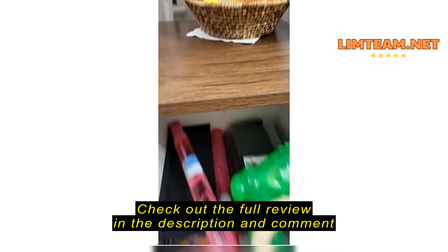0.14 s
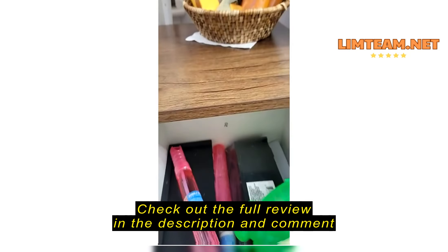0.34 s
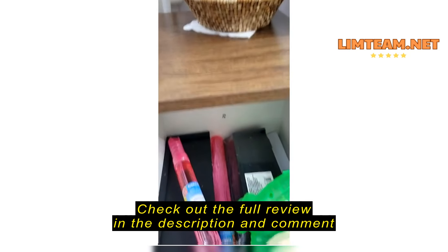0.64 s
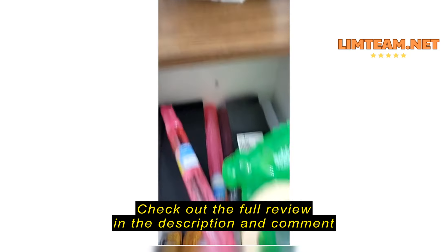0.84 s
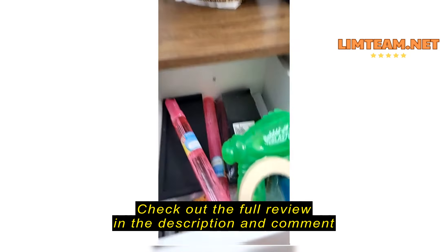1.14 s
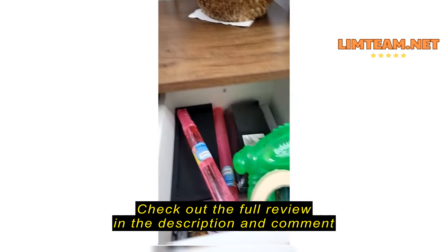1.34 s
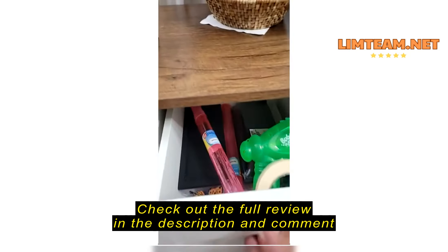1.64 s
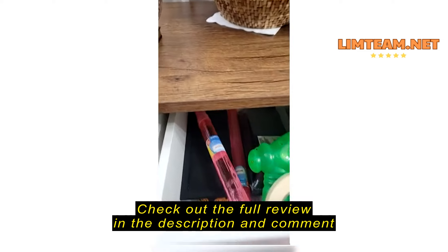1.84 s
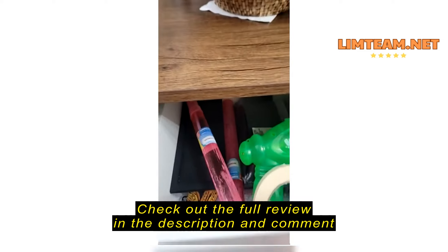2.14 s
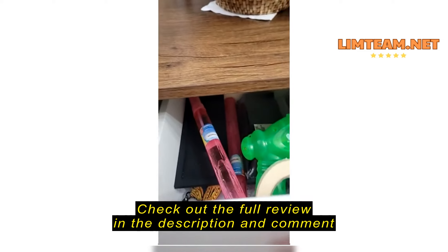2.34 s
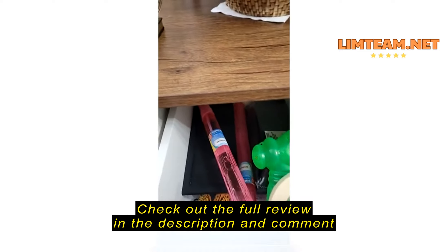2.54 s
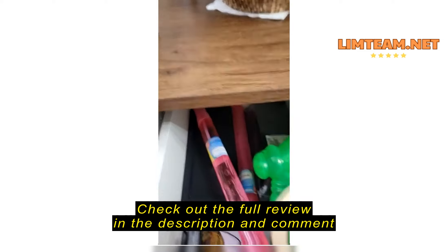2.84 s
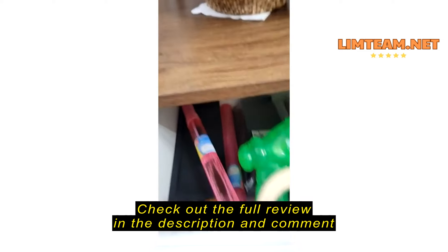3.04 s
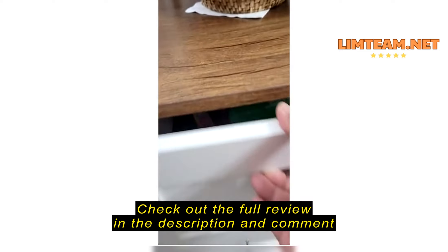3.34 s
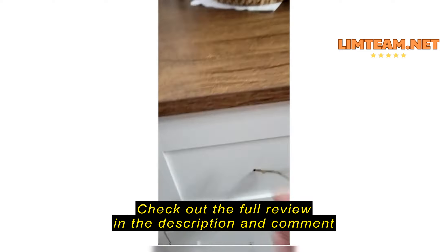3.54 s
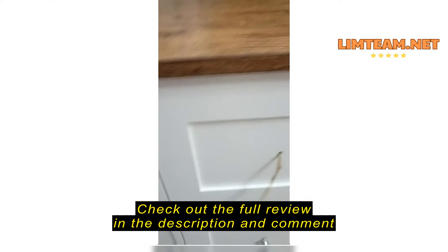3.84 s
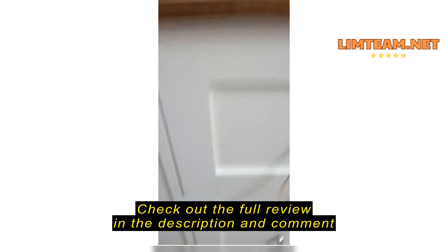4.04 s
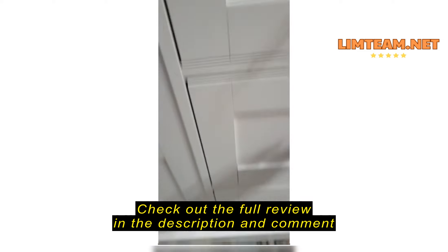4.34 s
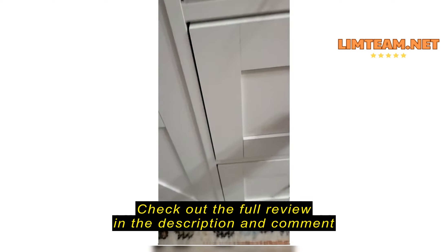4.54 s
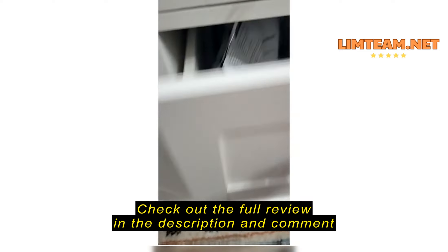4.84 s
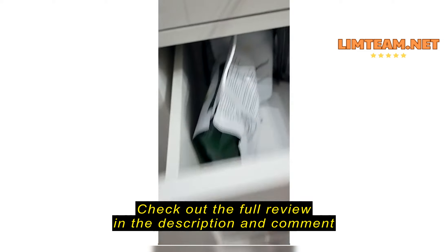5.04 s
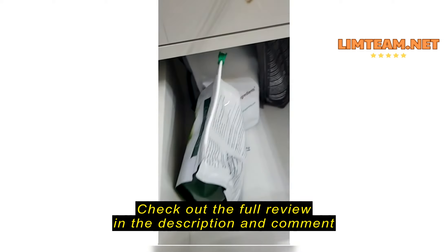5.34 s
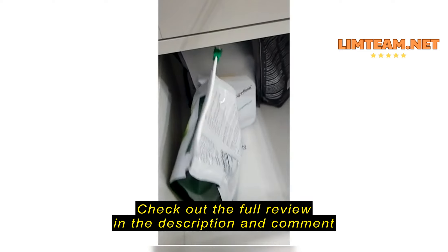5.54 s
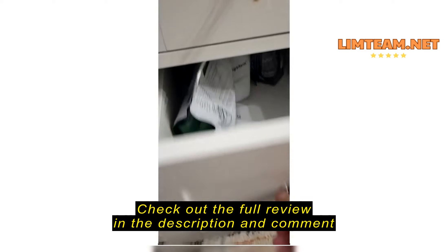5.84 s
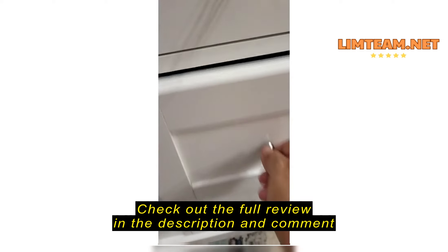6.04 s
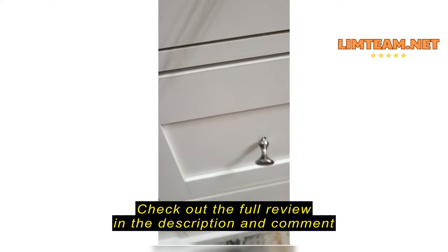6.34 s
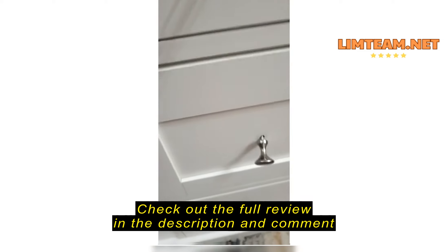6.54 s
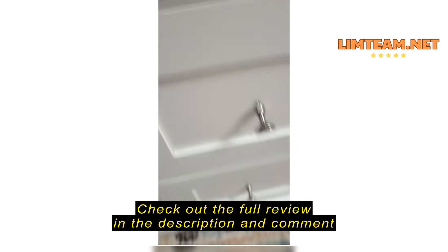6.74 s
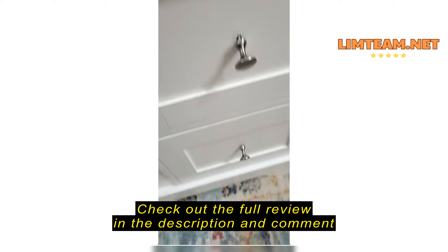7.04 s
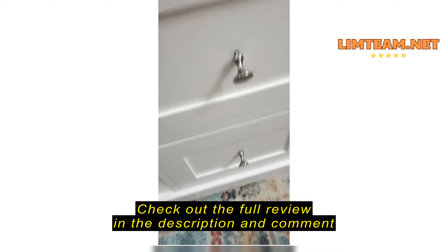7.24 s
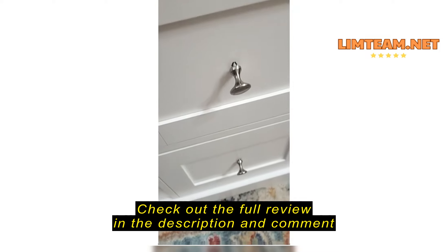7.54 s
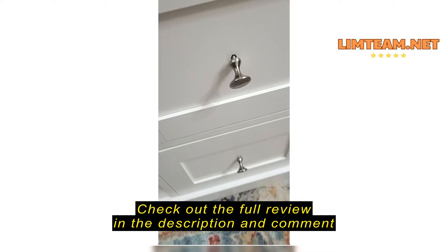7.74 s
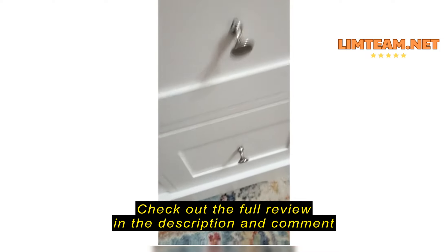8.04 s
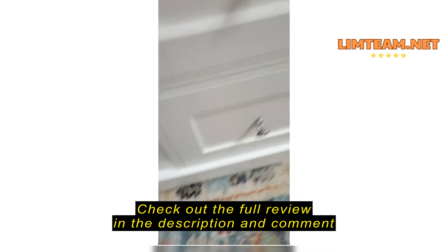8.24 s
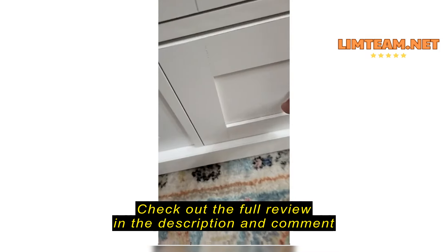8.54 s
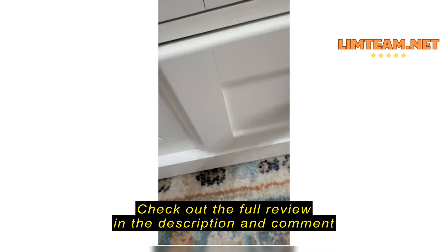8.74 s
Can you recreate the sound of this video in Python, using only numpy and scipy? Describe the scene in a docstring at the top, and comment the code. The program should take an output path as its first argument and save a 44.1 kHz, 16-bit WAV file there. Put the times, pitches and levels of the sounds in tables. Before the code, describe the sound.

Close to a handheld microphone in a small room, a wooden drawer scrapes softly with light clicks and rattling contents, then knocks loudly around one second. After a quiet gap, it shuts, and a second drawer bangs with a metallic jingle past four seconds, then closes near six. A third brings a busy run of clacks, scrapes and handle pings from seven to eight seconds. A low hum continues underneath.

```python
"""Three wooden kitchen drawers are pulled and pushed shut in turn, close to a hand-held microphone.
Filtered noise makes room air and a low hum throughout; from the start, strokes of gritty noise scrape
and tiny taps rattle. A thin whistle (0.18-0.88 s), ringing clicks and the first drawer's knocks follow.
The second drawer knocks after 3 s, joined by ringing metal fittings from 4.3 s, and the third after 6.5 s.
Knocks and rings are decaying tones and noise bursts; a small room answers all the drawer sounds."""
import sys
import numpy as np
from scipy import signal
from scipy.fft import rfft, irfft, next_fast_len
from scipy.io import wavfile
from scipy.ndimage import uniform_filter1d

SR = 44100
rng = np.random.default_rng(int(sys.argv[2]) if len(sys.argv) > 2 else 0)


def unload_audio(sound):
    """Save the sound as a 16-bit wav file, at the path given as the first command line argument."""
    columns = np.transpose(np.atleast_2d(sound))
    # keep every value between -1 and 1, then stretch to whole-number steps
    steps = np.round(np.clip(columns, -1, 1) * 32767)
    wavfile.write(sys.argv[1], SR, steps.astype(np.int16))


N = 391608
T = np.arange(2 ** 14) / SR  # time axis of one short sound, in seconds


def amp(db):
    """Turns decibels into gain."""
    return 10 ** (np.asarray(db) / 20)


def read(points, hz):
    """Reads a table along straight lines on a log-frequency axis."""
    f, value = np.transpose(points)
    return np.interp(np.log(hz + 1), np.log(f), value)


def evened(x):
    """Scales a sound to rms 1."""
    return x / np.sqrt(np.mean(x ** 2) + 1e-20)


def struck(x, size=600):
    """Scales a sound so that its first samples, the attack, have rms 1."""
    return x / np.sqrt(np.mean(x[..., :size] ** 2) + 1e-20)


def add(mix, s, sound, pan_db=0):
    """Places a sound at time s; a positive pan leans left, a negative one right."""
    part = mix[:, max(round(s * SR), 0):][:, :sound.shape[-1]]
    panned = sound * amp([[pan_db / 2], [-pan_db / 2]])
    part += panned[:, :part.shape[1]]


# how alike left and right are: (pitch_hz, likeness from 0 to 1)
LIKENESS = [(30, 0.11), (70, 0.99), (300, 0.88), (650, 0.56), (1200, 0.06), (3000, 0.031), (12000, 0.03)]


def colour(pair, spectrum):
    """Filters two unrelated signals into a coloured stereo pair, nearly mono in much of the bass."""
    hz = np.fft.rfftfreq(pair.shape[1], 1 / SR)
    a, b = rfft(pair)
    same = np.clip(read(LIKENESS, hz), -1, 1)
    right = same * a + np.sqrt(1 - same ** 2) * b
    coloured = np.array([a, right]) * amp(read(spectrum, hz))
    return evened(irfft(coloured, pair.shape[1]))


def fade(t60, rise, t=T):
    """A quick rise and an exponential decay that falls 60 dB in t60 seconds."""
    decay = np.exp(-np.log(1000) * t / max(t60, 1e-3))
    return decay * (1 - np.exp(-t / max(rise, 1e-5)))


def burst(spectrum, t60, rise):
    """Fading noise stands for countless close vibrations struck together."""
    noise = rng.standard_normal((2, len(T)))
    return struck(colour(noise, spectrum) * fade(t60, rise))


def ring(modes, rise, vary_db, spread, detune=0.016):
    """Separate fading tones; strength and pitch vary per hit, and higher tones differ more in phase."""
    out = np.zeros((2, len(T)))
    for hz, db, t60 in modes:
        strength, shift, left, right = rng.standard_normal(4)
        phase = spread * min((hz / 1100) ** 2, 2) * np.array([[left], [right]])
        t = T[:np.searchsorted(T, t60)]  # until the tone has died away
        wave = np.sin(2 * np.pi * hz * (1 + detune * shift) * t + phase)
        out[:, :len(t)] += amp(db + vary_db * strength) * fade(t60, rise, t) * wave
    return struck(out)


# tone colour of the room air, relative: (pitch_hz, level_db)
AIR_COLOUR = [(20, -18), (53, -1), (80, -1.5), (108, -7.5), (141, 1.5), (175, -7), (242, -3), (285, -12),
              (560, -17), (780, -14.5), (1200, -25), (3300, -34.5), (7000, -41), (9000, -52), (15500, -49)]
# rise and fall of the air, used as 0.8 times the difference from the median: (time_s, level_db)
AIR_SWELL = [(0, -53), (1.0, -48.5), (1.6, -55.5), (2.6, -52), (3.6, -50), (4.7, -55), (5.4, -52),
             (6.7, -51.5), (7.8, -44.5), (8.501, -57.5), (8.88, -56)]
# low hum lines, before the slight lean: (pitch_hz, width_hz, level_db)
HUM_LINES = [(55.4, 6, -56), (146, 10.7, -51), (242.2, 27.6, -47)]


def background(rumble_db=-59):
    """Coloured noise is the air, narrow noise bands the wavering hum, low noise a faint rumble per side."""
    s, db = np.transpose(AIR_SWELL)
    swell = amp(0.8 * np.interp(np.arange(N) / SR, s, db - np.median(db)))
    size = next_fast_len(N)
    air = amp(-42) * swell * colour(rng.standard_normal((2, size)), AIR_COLOUR)[:, :N]
    hz = np.fft.rfftfreq(size, 1 / SR)
    hum = 0
    for centre, width, level_db in HUM_LINES:
        narrow = 1 / (1 + (2 * (hz - centre) / width) ** 2)
        line = irfft(rfft(rng.standard_normal(size)) * narrow, size)[:N]
        hum = hum + amp(level_db) * evened(line)
    low_pass = signal.butter(2, 70, fs=SR, output="sos")
    rumble = signal.sosfilt(low_pass, rng.standard_normal((2, N)))
    lean_right = amp([[-.7], [.7]])
    return (air + hum) * lean_right + amp(rumble_db) * evened(rumble)


STROKE_ATTACK_S, STROKE_RELEASE_S = 0.0074, 0.024  # linear rise; time constant of the dying away
STROKE_ARCH_DB = 2.5  # friction is strongest mid-stroke


def effort(t, length):
    """A stroke starts quickly, arches while the hand moves, and dies away."""
    arch_db = -STROKE_ARCH_DB * (2 * np.minimum(t / length, 1) - 1) ** 2
    attack = np.minimum(t / STROKE_ATTACK_S, 1)
    release = np.exp(-np.maximum(t - length, 0) / STROKE_RELEASE_S)
    return attack * amp(arch_db) * release


# strokes of sliding and rustling, levels relative: (start_s, length_s, effort_db, brightness_db)
STROKES = [(.01, 0.15, -45.5, 7), (.23, 0.16, -45, -2), (1.069, 0.075, -26, 8.5), (2.002, 0.44, -55, 7),
           (3.66, 0.17, -43, -18), (3.831, 0.14, -37.5, -12), (3.981, 0.24, -32.5, -15),
           (4.266, 0.089, -20.5, 5.5), (5.444, 0.14, -49.5, 14), (5.748, .11, -25.5, 7),
           (5.88, 0.083, -36, 7), (6.209, 0.074, -27, 5.5), (6.412, 0.05, -31.5, 4),
           (6.553, 0.13, -42.5, 14), (6.854, .1, -48, 19.5), (7.009, .08, -29.5, 0), (7.2, 0.098, -22, 0),
           (7.59, 0.11, -19, 4), (7.78, .17, -35.5, -13), (8.09, 0.083, -22, 11.5)]
# colours of the dense vibration of each part, relative: (pitch_hz, level_db)
# heavy drawer frame
CARCASS = [(25, -25), (55, -29), (85, -4), (150, -2.5), (240, -16.5), (400, -38), (900, -62)]
# thin wooden boards
PANEL = [(130, -14), (260, 2), (400, -3.5), (520, -9), (660, -1), (950, -9), (1350, -11), (1900, -24),
         (4000, -54)]
# touching surfaces
CONTACT = [(600, -7), (1300, -3), (1800, -1), (2200, 0.5), (2700, 2), (3400, -4.5), (4300, -4),
           (5500, -7.5), (6600, -6.5), (8000, -16.5), (10000, -32), (16000, -39)]
# sharp treble of a contact
SNAP = [(4000, -5), (7500, -2.5), (8600, -3.5), (10500, -9), (13000, -7), (15500, -10.5), (17000, -12)]
GRIT_DB, WOOD_DB, BOOM_DB, FIZZ_DB = -15.5, -10.5, -12, -25  # before effort and brightness
WOOD_PER_BRIGHT = -0.29  # a bright, light rub shakes the wood less


def slides(slips_per_s=700, smooth=0.5):
    """Many tiny slips swell and fade with each push, shaking every part of the drawer."""
    out = np.zeros((2, N))
    t = np.arange(2 * len(T)) / SR
    for s, length, effort_db, bright_db in STROKES:
        sizes = amp(3.5 * np.minimum(rng.exponential(1, len(t)), 3))
        slips = (rng.random(len(t)) < slips_per_s / SR) * sizes
        drive = (slips + smooth) * rng.standard_normal((2, len(t)))
        shake_db = WOOD_PER_BRIGHT * bright_db
        grit = amp(GRIT_DB) * colour(drive, CONTACT)
        wood = amp(WOOD_DB + shake_db) * colour(drive, PANEL)
        boom = amp(BOOM_DB + shake_db) * colour(drive, CARCASS)
        fizz = amp(FIZZ_DB + bright_db) * colour(drive, SNAP)
        sound = grit + wood + boom + fizz
        add(out, s, amp(effort_db) * effort(t, length) * sound, pan_db=-2.0)
    return out


# time the echoes take to fall 60 dB: (pitch_hz, decay_s)
ROOM_DECAY = [(80, 0.79), (210, 0.29), (560, 0.37), (1500, 0.27), (3900, 0.26), (7000, 0.21), (12000, 0.29)]
# how strongly the room answers: (pitch_hz, level_db)
ROOM_SEND = [(60, -19.5), (200, -3), (600, -9), (1500, -6.5), (4000, -6), (12000, -10.5)]


def room(x):
    """Dense reflections of a small kitchen: noise whose bands each die at their own speed."""
    flat = [(20, 0), (20000, 0)]
    taps = colour(rng.standard_normal((2, len(T))), flat)
    hz, t, z = signal.stft(taps, SR, nperseg=256)
    t60 = np.maximum(read(ROOM_DECAY, hz), .05)[:, None]
    unit_energy = np.sqrt(2 * np.log(1000) / (t60 * SR))
    decay = np.exp(-np.log(1000) * t / t60)
    z *= unit_energy * amp(read(ROOM_SEND, hz))[:, None] * decay
    onset = np.clip((T - .004) / 0.0039, 0, 1)  # silent for 4 ms, then fades in
    tail = signal.istft(z, SR, nperseg=256)[1][:, :len(T)] * onset
    return signal.fftconvolve(x, tail, axes=1)[:, :N]


def rattles(count=4, rattle_db=-16, t60=0.076, wood_db=-12):
    """Loose contents tap against each other and the drawer floor during every stroke."""
    out = np.zeros((2, N))
    for s, length, effort_db, _ in STROKES:
        times = length * rng.random(count)
        for when, (size, pitch) in zip(times, rng.standard_normal((count, 2))):
            hz = 1700 * np.exp(.35 * pitch)
            modes = [(hz, 0, t60), (hz * 1.47, -2, t60), (hz * 2.5, -5, t60)]
            tap = amp(rattle_db) * ring(modes, rise=0.00016, vary_db=2.0, spread=0.64)
            wood = amp(wood_db) * burst(PANEL, t60=0.031, rise=0.00072)
            level = amp(effort_db + 2 * size) * effort(when, length)
            add(out, s + when, level * (tap + wood), pan_db=-1.0)
    return out


def squeal(start=0.18, end=0.88, start_hz=14600, end_hz=13700, waver_hz=330, level_db=-68):
    """A dry runner of the first drawer whistles: a faint tone that sinks and wavers in pitch."""
    count = round((end - start) * SR)
    drift = evened(uniform_filter1d(rng.standard_normal(count), size=60))
    pitch = np.linspace(start_hz, end_hz, count) + waver_hz * drift
    whistle = np.sin(2 * np.pi * np.cumsum(pitch) / SR)
    out = np.zeros((2, N))
    add(out, start, amp(level_db) * signal.windows.tukey(count, 1 / 10) * whistle)
    return out


# light clicks of handles and small things: (start_s, level_db, brightness_db, decay_s, pitch_hz)
CLICKS = [(0.2252, -35, -10, 0.089, 2040), (.3547, -29, -7, 0.029, 3910), (0.5966, -33, 0, 0.16, 2800),
          (.626, -24, -6, .06, 2760), (2.0078, -45.5, 8, 0.035, 1400), (3.5473, -38.5, 6.5, 0.029, 3320),
          (3.8472, -34, -15, .05, 2280), (5.341, -31.5, 10.5, .02, 3330), (5.365, -29, 6.5, 0.021, 4200),
          (6.6618, -29.5, 8, 0.023, 4390), (6.8354, -33.5, 14.5, 0.0091, 2720),
          (7.039, -22.5, -15, 0.045, 2595), (7.479, -22.5, 3, 0.035, 2790),
          (7.7434, -23.5, -12, .045, 4210)]
# ring of a small object, relative: (multiple of its pitch, level_db)
SMALL_MODES = [(1, 1.5), (1.5, -4), (2.15, -6.5)]
CLICK_SNAP_DB, CLICK_LEAN_PER_DB = -20, -0.3  # brighter clicks lean further right


def clicks(body_db=-22):
    """Small hard contacts ring briefly and barely move the wood."""
    out = np.zeros((2, N))
    for s, click_db, bright_db, t60, hz in CLICKS:
        modes = [(hz * multiple, db, t60) for multiple, db in SMALL_MODES]
        touch = amp(-15) * burst(CONTACT, t60, rise=0.00096)
        tone = amp(-15) * ring(modes, rise=0.00034, vary_db=1.5, spread=0.54)
        wood = amp(body_db) * burst(PANEL, t60=0.03, rise=.0007)
        snap = amp(CLICK_SNAP_DB + bright_db) * burst(SNAP, t60 * 1.7, rise=0.00027)
        sound = touch + tone + wood + snap
        add(out, s, amp(click_db) * sound, CLICK_LEAN_PER_DB * bright_db - 3.5)
    return out


def panels(modes, upper_db, lower_db, tones_db=-10.5, dense_db=-12):
    """Where the blow lands decides whether the low or the high panel tones speak most."""
    def favour(hz):
        """Slides from the lower to the upper strength between 400 and 750 Hz."""
        return read([(400, lower_db), (750, upper_db)], hz)

    struck_modes = [(hz, db + favour(hz), t60) for hz, db, t60 in modes]
    tones = ring(struck_modes, rise=.0007, vary_db=1, spread=.8, detune=.02)
    dense_colour = [(hz, db + favour(hz)) for hz, db in PANEL]
    dense = burst(dense_colour, t60=0.064, rise=0.00031)
    strength = np.hypot(amp(upper_db), amp(lower_db))
    return strength * (amp(tones_db) * tones + amp(dense_db) * dense)


# blows on wood; weight favours the frame, hardness the contact, depth the low panel tones:
# (start_s, strength_db, weight_db, hardness_db, depth_db), all relative
KNOCKS = [(.25, -26.5, -18, -7.5, -6), (.623, -23, 0, -1.5, -7), (.838, -12, 0, -4.5, 0),
          (1.088, -5.5, -6.5, -14, -4.5), (1.138, -32, 12, 2.5, 0), (1.22, -12, -5.5, -16.5, -4),
          (1.312, -15, -2.5, -18.5, 0), (1.986, -41.5, -15, -5, 7.5), (3.661, -29, -3, -7, -15),
          (3.872, -28, -5, -12, -44), (3.964, -28, 2, 3.5, -6), (4.042, -25.5, -0.5, -2.5, -2),
          (4.26, -20, 2, -4.5, -4), (4.282, -17.5, -26, -21, 5.5), (4.309, -11.5, -9.5, -7, -12),
          (4.348, -9, -22, -12.5, 3), (4.453, -28, -3.5, -9, -8), (4.476, -20.5, -8.5, -17.5, 4),
          (5.364, -27, -6, -15, 5), (5.761, -29, 0, 6, -17), (5.806, -14, -1, -1, -5),
          (5.818, -12.5, -6.5, -14, -1), (5.863, -11.5, -20, -22, -8.5), (5.882, -16, -15, -21, -7),
          (6.217, -27, 2, 4.5, -5), (6.257, -17.5, -20, -18, -10.5), (6.388, -27, -6, 2, -36),
          (6.44, -24.5, -11, -12, -11.5), (7.033, -21, -4.5, -9, -16), (7.109, -24.5, 1.5, -8.5, 3),
          (7.203, -32.5, -10, 10.5, 0), (7.224, -16.5, -3.5, -6.5, -1), (7.247, -16.5, -22, -17, -0.5),
          (7.273, -17.5, -4, -29, 2), (7.435, -29.5, -14, -19, -2), (7.533, -24.5, 10, 7.5, -3),
          (7.604, -25.5, 8, -6, 2.5), (7.646, -22.5, -10, 3.5, -3), (7.653, -14.5, 0, -1.5, -4.5),
          (7.729, -19, -14, -21, -1), (7.852, -25.5, -20, -19, -32), (7.903, -28.5, -29, -4.5, -27),
          (7.953, -21.5, 9.5, 4.5, -25), (8.082, -16.5, 10, -2.5, 0), (8.114, -13.5, -5, -26, -9.5)]
# tones of each drawer with its frame, relative: (pitch_hz, level_db, decay_s)
FIRST = [(70.3, -11, 0.38), (106.3, -5.5, 0.29), (136, 4, 0.14), (161.6, -6.5, 0.15), (240.5, -2, 0.13),
         (311, 11, 0.074), (435, -3.5, 0.22), (482.6, 8, 0.085), (558, 0.5, 0.13), (638, -10, 0.29),
         (790, -2, 0.11), (908, 5, 0.054), (957, 0, 0.052), (1290, -11, 0.092)]
SECOND = [(71, -19, 0.23), (93.2, -7.5, 0.16), (141, -4, 0.13), (225.2, -6.5, 0.17), (301, 2, 0.05),
          (383, 5.5, 0.037), (617, -1.5, 0.065), (674, -3, 0.05), (835, -10.5, .05), (1120, -5, 0.04),
          (1356, 1, 0.019)]
THIRD = [(67.4, -17, 0.96), (90.8, -4, 0.22), (111.5, 1.5, 0.1), (134.2, -1.5, 0.18), (199.4, -6.5, 0.13),
         (291, 2, 0.082), (372, 1, 0.11), (574, 3.5, 0.086), (662, 6.5, 0.066), (783, -1, 0.068),
         (1066, 4.5, 0.042), (1188, -0.5, 0.083), (1304, 1, 0.061)]
# short clack of the runners and stops of each drawer, relative: (pitch_hz, level_db, decay_s)
FIRST_CLACK = [(1757, 5, 0.037), (2656, -1, 0.092), (2910, -2, 0.051), (3220, 0, 0.043), (4020, 2, 0.03),
               (4770, 5, 0.032)]
SECOND_CLACK = [(2083, 10, 0.047), (3500, 2, 0.061), (3910, -1.5, 0.038), (4220, 6, 0.04),
                (5050, 4.5, 0.038), (6370, -28, .04)]
THIRD_CLACK = [(1850, -4, 0.049), (2200, -3, 0.035), (2630, 1, 0.027), (4260, 9, 0.024), (5520, 2, .04),
               (6500, -6, 0.049)]
SECOND_FROM_S, THIRD_FROM_S = 3.0, 6.5  # later blows belong to the next drawer
SPLIT_HZ = 260  # frame tones lie below, panel tones above
FIRM_DB, CRACK_T60_S = -20, 0.039  # a firm blow cracks this long; weaker ones chatter longer
CRACK_HALVING_DB = 32  # a blow this much stronger cracks half as long
SNAP_DB, LEAN_PER_DB = -18.5, -0.18  # snap before the contact level; stronger blows lean further right


def knocks():
    """The contact cracks and the panels knock together; the heavy frame swells a moment later."""
    out = np.zeros((2, N))
    drawers = [(FIRST, FIRST_CLACK), (SECOND, SECOND_CLACK), (THIRD, THIRD_CLACK)]
    for s, strength_db, weight_db, hardness_db, depth_db in KNOCKS:
        modes, stops = drawers[int(s > SECOND_FROM_S) + int(s > THIRD_FROM_S)]
        low_modes = [m for m in modes if m[0] < SPLIT_HZ]
        high_modes = [m for m in modes if m[0] >= SPLIT_HZ]
        t60 = CRACK_T60_S * 2 ** ((FIRM_DB - strength_db) / CRACK_HALVING_DB)
        pan_db = LEAN_PER_DB * (strength_db - FIRM_DB)
        thud = ring(low_modes, rise=0.0052, vary_db=1, spread=5.2, detune=0.023)
        # countless weaker frame vibrations blur the boom
        thud = thud + amp(-5.0) * burst(CARCASS, t60=0.13, rise=0.0079)
        panel = panels(high_modes, strength_db, strength_db + depth_db)
        clack = amp(-11.5) * ring(stops, rise=0.00049, vary_db=2, spread=1.0, detune=0.022)
        crack = amp(-5.0) * burst(CONTACT, t60, rise=0.0031)
        snap = amp(SNAP_DB) * burst(SNAP, t60 * 2.2, rise=0.00033)
        contact = amp(strength_db + hardness_db)
        add(out, s + 0.0024, amp(strength_db + weight_db - 5) * thud, pan_db=-2.0)
        add(out, s, panel, pan_db=-1.0)
        add(out, s, contact * (crack + clack), pan_db - 2.5)
        add(out, s, contact * snap, pan_db - 5.5)
    return out


# a hanging metal handle is jolted: (start_s, level_db, top_ring_db)
PINGS = [(4.3028, -20.5, -19), (4.49, -30.5, -42), (5.932, -28, -23), (6.259, -22.5, -36),
         (7.3015, -24, -36), (7.6528, -25, -31), (8.153, -35, -34)]
# ring of the metal fittings, relative: (pitch_hz, level_db, decay_s)
METAL = [(2740, -14, 0.038), (2790, 0.5, 0.094), (3120, -1, 0.039), (3294, 4.5, 0.03), (7100, -10, 0.045),
         (12300, -17, 0.07)]
# colour of their thin top ring, relative: (pitch_hz, level_db)
METAL_TOP = [(13500, -45), (14700, -14), (15000, 0), (15250, -17), (15700, -40)]
SWING_S, SWING_LOSS_DB = .07, -14  # it swings back and taps again, more softly


def pings(count=3):
    """Metal fittings chatter and ring briefly after a jolt, and again as they swing back."""
    out = np.zeros((2, N))
    for s, ping_db, top_db in PINGS:
        for swing in range(2):
            level = amp(ping_db + swing * SWING_LOSS_DB)
            delays = np.r_[0, rng.random(count - 1)] * .025  # seconds
            for delay in delays:
                low = amp(-16.0) * ring(METAL, rise=0.00053, vary_db=6.5, spread=1.88, detune=0.023)
                top = amp(top_db) * burst(METAL_TOP, t60=0.16, rise=0.0018)
                add(out, s + swing * SWING_S + delay, level * (low + top), pan_db=0.5)
    return out


def scene():
    """The drawers and their echoes in the room, over the air and hum."""
    drawers = knocks() + clicks() + slides() + rattles() + pings() + squeal()
    return drawers + room(drawers) + background()


def record(dry, low_hz=32, edge_hz=15900):
    """The microphone's bass roll-off, the full-scale limit, then a treble cut-off."""
    bass_cut = signal.butter(2, low_hz, "high", fs=SR, output="sos")
    sound = signal.sosfilt(bass_cut, dry)
    edge = signal.firwin(511, edge_hz, window=("kaiser", 9), fs=SR)
    return signal.oaconvolve(np.clip(sound, -1, 1), edge[None], "same")


dry = scene()
out = record(dry)
unload_audio(out)
```